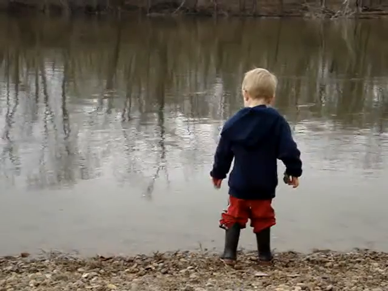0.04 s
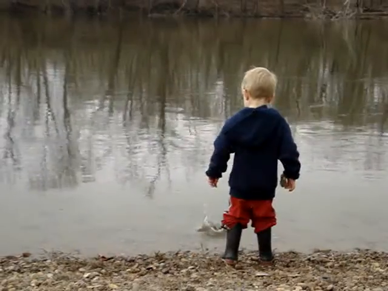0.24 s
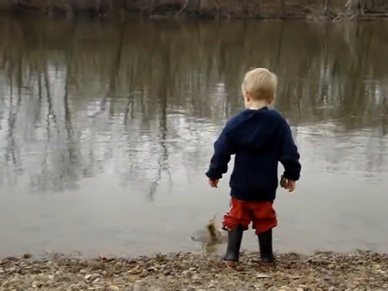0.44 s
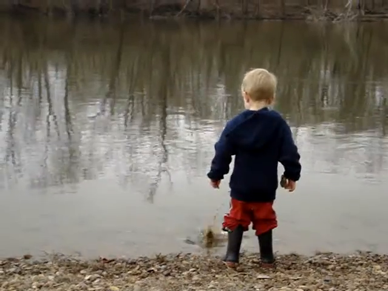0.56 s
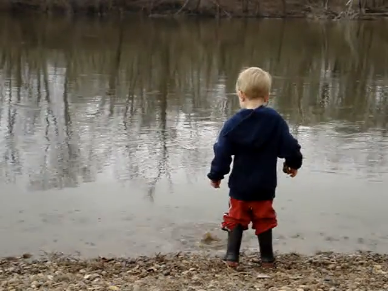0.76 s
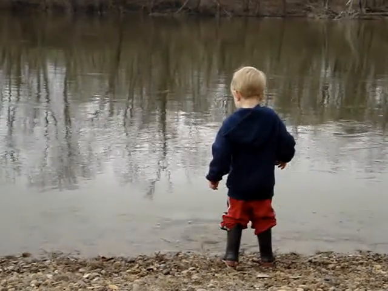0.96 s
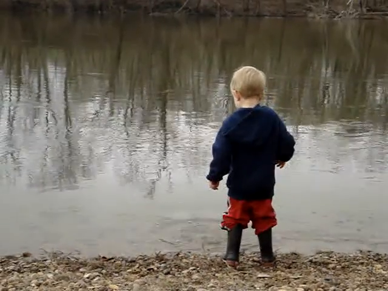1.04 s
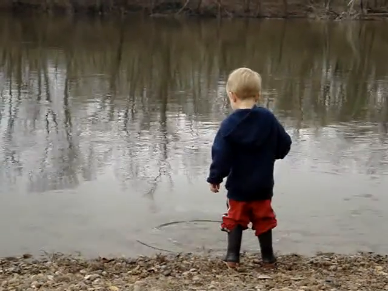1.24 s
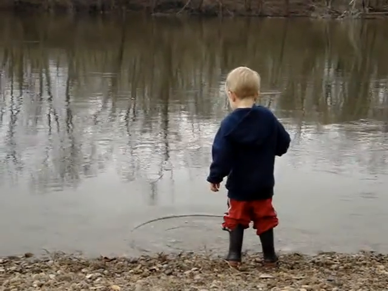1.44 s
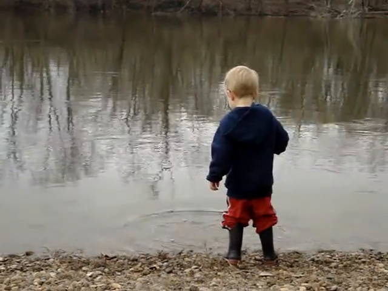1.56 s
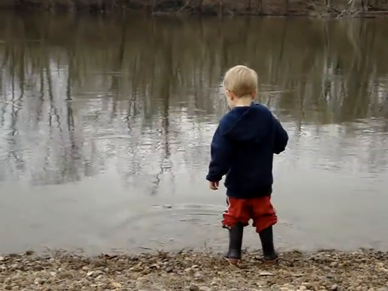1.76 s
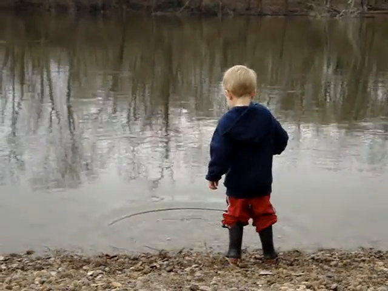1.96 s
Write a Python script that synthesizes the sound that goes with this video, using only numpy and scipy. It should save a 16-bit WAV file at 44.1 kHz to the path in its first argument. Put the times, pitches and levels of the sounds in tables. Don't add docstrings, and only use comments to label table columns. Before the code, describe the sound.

One close stone splash early on, sharp and brief, followed by light pattering drops and thin fizz; behind it a quiet outdoor river bed, very faint bird whistles and insect chirps, and slight camera whine.

```python
import sys
import numpy as np
from scipy import signal
from scipy.fft import rfft, irfft
from scipy.io import wavfile
from scipy.ndimage import uniform_filter1d

SR = 44100
rng = np.random.default_rng(int(sys.argv[2]) if len(sys.argv) > 2 else 0)


def generate_wav(sig):
    pcm = np.round(np.clip(np.atleast_2d(sig).T, -1, 1) * 32767).astype(np.int16)
    wavfile.write(sys.argv[1], SR, pcm)


def attenuation_scalar(level_db):
    decades = np.asarray(level_db, float) / 20
    return 10 ** decades


N = 88200

# pitch_hz, density_db (per Hz)
RIVER_SPECTRUM = [(12, -46), (20, -14), (261, 0.5), (357, -5), (1270, -7.5), (2570, -11.5), (3790, -13),
                  (7840, -20.5), (9900, -33.5), (12900, -61), (21800, -120)]
# start_s, length_s, start_hz, end_hz, level_db (rms)
BIRD_WHISTLES = [(0.14, .08, 3680, 3600, -63), (0.44, .08, 3700, 3720, -63), (0.66, .18, 3800, 3660, -59),
                 (0.85, .05, 3680, 3680, -63), (0.985, .14, 3760, 3700, -60), (1.185, .06, 3830, 3720, -58),
                 (1.235, .085, 3730, 3720, -61), (1.33, .06, 3800, 3850, -63),
                 (1.405, .065, 3850, 3720, -60), (1.53, .07, 3880, 3700, -60),
                 (1.64, .045, 4000, 3750, -63), (1.73, 0.05, 4150, 3650, -61),
                 (1.82, 0.045, 4050, 3680, -61), (1.895, .045, 4050, 3700, -62),
                 (1.97, .03, 3950, 3850, -62)]
# start_s, length_s, level_db (rms)
INSECT_CHIRPS = [(0.03, .04, -65), (0.15, .04, -66), (1.40, .03, -66), (1.465, .025, -61),
                 (1.497, .027, -59), (1.535, .04, -63), (1.60, .025, -63), (1.632, .025, -61),
                 (1.666, .036, -60), (1.76, .04, -68), (1.975, .03, -61)]
# start_s, crack_db, spray_db, spray_t60_s, spray_hz
SURFACE_SLAPS = [
    (0.2455, -60, -31, .03, 2300),
    (0.2486, -2.2, -17, .015, 3000),
    (0.2555, -45, -27, .014, 3200),
    (0.2656, -24, -25, .024, 2300),
    (0.2695, -50, -30, .014, 5000),
]
# start_s, level_db, pitch_hz, t60_s, glide_octaves_per_s
CAVITY_POCKETS = [(0.2372, -35, 810, .015, 0), (0.2487, -12, 3800, .009, 0), (0.2495, -11, 920, .024, -16),
                  (0.2495, -14, 2550, .016, -5), (0.2488, -15, 1400, .010, -20),
                  (0.2560, -29, 800, .03, -5), (0.2555, -28, 3800, .012, 0), (0.2495, -27, 8100, .012, -10),
                  (0.2659, -16, 1780, .021, -12), (0.2672, -21, 2800, .018, 0),
                  (0.2705, -25, 2500, .012, 20), (0.2700, -25, 1450, .016, -10),
                  (0.2660, -24, 680, .04, -8), (0.2780, -30, 600, .04, -5), (0.2768, -38, 4200, .015, 0),
                  (0.2760, -34, 2100, .03, 0)]
# start_s, level_db, pitch_hz, length_s,
# glide_octaves_per_s
GURGLE_BUBBLES = [(0.306, -46, 810, 0.0091, 0), (0.315, -37.5, 990, 0.011, 5), (0.326, -42, 980, .010, -25),
                  (0.339, -33, 540, 0.015, 12.5), (0.352, -42, 563, 0.0085, 0),
                  (0.359, -33, 587, 0.012, 34), (0.332, -44, 1400, 0.011, -2), (0.500, -48, 100, .035, -20),
                  (0.600, -54, 75, .05, -5), (0.700, -55, 70, .05, 0), (0.426, -39.5, 615, 0.005, -3),
                  (0.403, -47, 190, 0.018, 16), (0.79, -46.5, 798, 0.014, 0),
                  (0.780, -47.5, 2000, 0.011, 3), (1.385, -52.5, 1290, 0.062, 0)]
# start_s, ring_db, pitch_hz, t60_s, tick_db
FALLING_DROPS = [(0.298, -46, 2700, .02, -50), (0.301, -48, 5700, .015, -55), (0.310, -45, 2200, .015, -49),
                 (0.334, -46, 3300, .012, -48), (0.343, -49, 6500, .012, -48), (0.351, -48, 7000, .01, -47),
                 (0.359, -47, 3300, .012, -52), (0.3165, -35.5, 1380, 0.013, -43),
                 (0.381, -36, 3700, 0.016, -39), (0.3805, -46, 9000, .008, -52),
                 (0.384, -39, 2970, .02, -44), (0.443, -47, 3620, .02, -52),
                 (0.4597, -34, 3600, 0.017, -40), (0.4733, -44, 5960, .014, -40),
                 (0.475, -38, 6580, .014, -44), (0.506, -44, 8900, .008, -52),
                 (0.511, -42, 8960, 0.01, -43), (0.522, -41, 5970, .012, -52),
                 (0.5316, -29.5, 3070, 0.015, -33), (0.535, -36.5, 1030, 0.019, -40),
                 (0.5558, -35, 2480, 0.013, -41), (0.5572, -36, 3100, 0.013, -47),
                 (0.600, -46, 4580, 0.012, -53), (0.6166, -34.5, 1410, 0.041, -44),
                 (0.527, -48, 4500, .01, -48), (0.545, -50, 6000, .01, -47), (0.584, -50, 5500, .01, -46),
                 (0.634, -45, 6800, .01, -47), (0.65, -54, 5000, .01, -46),
                 (0.6719, -29.5, 3000, 0.013, -40), (0.6716, -38, 8500, .008, -30.5),
                 (0.688, -35.5, 5720, 0.011, -38), (0.695, -47, 9000, .008, -43),
                 (0.689, -35, 1064, 0.027, -49), (0.703, -39, 1250, 0.045, -52),
                 (1.650, -48, 2905, 0.032, -50), (1.108, -41.5, 2910, 0.023, -50),
                 (1.490, -52, 5000, 0.015, -42)]
# start_s, length_s, low_hz, high_hz, depth_db
BAND_DIPS = [(0.220, .025, 1400, 11000, -50), (0.224, .010, 30, 2500, -32),
             (0.230, .007, 30, 2500, -10), (0.283, .009, 2100, 3300, -22),
             (0.259, .0065, 2800, 11000, -12), (0.240, .036, 9000, 11000, -8),
             (0.2525, .009, 7000, 11000, -8), (0.275, .018, 4300, 5300, -14),
             (0.51, .018, 2900, 3400, -14), (0.273, .022, 5200, 7300, -35),
             (0.272, .020, 8200, 11000, -22), (0.277, .007, 7300, 8200, -25),
             (0.322, .008, 8300, 11000, -20), (0.361, .012, 5800, 6800, -18),
             (0.388, .008, 7800, 11000, -22), (0.450, .008, 9000, 11000, -22),
             (0.480, .027, 5300, 7300, -22), (0.563, .018, 5300, 7000, -16),
             (0.654, .015, 5000, 11000, -35), (0.678, .009, 5500, 11000, -28),
             (0.693, .033, 5200, 5900, -20), (0.608, .022, 6700, 7300, -20),
             (0.537, .010, 8300, 11000, -25), (1.497, .02, 6100, 8800, -18),
             (1.523, .010, 8200, 11000, -20), (1.541, .008, 8200, 11000, -20),
             (0.922, .010, 6500, 8300, -16)]

RIVER_DB, CRACKLE_DB = -48.5, 2.5
RUMBLE_DB, FLICKER_DB = 2.5, 1.01
WHINE_HZ, WHINE_WIDTH_HZ, WHINE_DB = 7568, 25, -67.5
INSECT_HZ = 5775
PUFF_S, PUFF_T60_S, PUFF_HZ, PUFF_DB = 1.930, 0.33, 123.4, -40.5
FIZZ_DB, FIZZ_START_S, FIZZ_T60_S, FIZZ_HZ = -48, 0.3, 1.4, 3000
DROP_GLIDE, CLICK_DB = 10.4, 5.5
TICK_HZ, TICK_T60_S = 5000, .014
CAVITY_RAGGED_DB = 1.2
THUMP_DB, THUMP_HZ, THUMP_T60_S = -32.5, 324, 0.009
HOLE_SHARE, BUSY_SHARE, HOLE_DB = .27, .5, -26
BUSY_S = (.27, .76)
TOP_HZ, MIC_HZ = 10020, 42


def band(x, hz, width):
    edges = [max(hz - width / 2, 5), hz + width / 2]
    return signal.sosfilt(signal.butter(1, edges, "band", fs=SR, output="sos"), x)


def unit(x):
    return x / np.sqrt(np.mean(x ** 2))


def walk(rate):
    k = int(SR / rate)
    return unit(uniform_filter1d(uniform_filter1d(rng.standard_normal(N), k), k))


def ragged(t, depth_db):
    return attenuation_scalar(depth_db * unit(uniform_filter1d(rng.standard_normal(len(t)), size=50)))


def add(out, s, sound):
    i = int(s * SR)
    out[i:i + len(sound)] += sound[:N - i]


def age(length):
    return np.arange(int(length * SR)) / SR


def decay(db, t, t60):
    return attenuation_scalar(db - 60 * t / t60)


def rise(t, seconds):
    return 1 - np.exp(-t / seconds)


def swell(t, length, edge):
    return np.sin(np.pi / 2 * np.clip(np.minimum(t, length - t) / edge, 0, 1)) ** 2


def tone(t, hz, glide):
    return np.sin(2 * np.pi * np.cumsum(hz * 2 ** (glide * t)) / SR)


def click(t, peak_s, width_s):
    return np.exp(-((t - peak_s) / width_s) ** 2)


def burst(db, hz, t60, rise_s):
    t = age(.06)
    hiss = unit(band(band(rng.standard_normal(len(t)), hz, 1.67 * hz), hz, 1.71 * hz))
    return decay(db, t, t60) * rise(t, rise_s) * hiss


def river():
    out, drift = 0, walk(1.7)
    table = np.array(RIVER_SPECTRUM)
    for hz in 25 * 2 ** np.arange(.5, 8.9, .5):
        noise = rng.standard_normal(N) * attenuation_scalar(CRACKLE_DB * rng.exponential(size=N))
        flicker_db = (RUMBLE_DB if hz < 150 else FLICKER_DB) * walk(7.8)
        density_db = np.interp(np.log(hz), np.log(table[:, 0]), table[:, 1])
        db = density_db + 0.19 * drift + flicker_db
        out = out + attenuation_scalar(db) * band(band(noise, hz, 0.56 * hz), hz, 0.56 * hz)
    return attenuation_scalar(RIVER_DB) * unit(out)


def camera_whine():
    pitch_hz = WHINE_HZ + WHINE_WIDTH_HZ * walk(79)
    return attenuation_scalar(WHINE_DB) * np.sin(2 * np.pi * np.cumsum(pitch_hz) / SR)


def wildlife():
    out = np.zeros(N)
    for s, length, hz, end_hz, db in BIRD_WHISTLES:
        t = age(length)
        glide = np.log2(end_hz / hz) / length
        add(out, s, attenuation_scalar(db + 3.0) * swell(t, length, .010) * tone(t, hz, glide))
    for s, length, db in INSECT_CHIRPS:
        t = age(length)
        add(out, s, attenuation_scalar(db + 3.5) * swell(t, length, 0.007) * tone(t, INSECT_HZ, 0))
    return out * attenuation_scalar(1.1 * walk(60))


def wind():
    out, t = np.zeros(N), age(.1)
    pitch_hz = PUFF_HZ * (1 + .05 * walk(60)[:len(t)] - 1.8 * t)
    phase = 2 * np.pi * np.cumsum(pitch_hz) / SR
    harmonic = attenuation_scalar(-8.5) * np.sin(2 * phase - 1.3)
    noise = attenuation_scalar(-6.5) * unit(band(rng.standard_normal(len(t)), PUFF_HZ, 140))
    flutter = np.sin(phase) + harmonic + noise
    add(out, PUFF_S, decay(PUFF_DB, t, PUFF_T60_S) * rise(t, 0.0039) * flutter)
    return out


def fizz():
    out, t = np.zeros(N), age(1.1)
    strength_db = 5.5 * np.minimum(rng.exponential(size=len(t)), 4.5)
    grains = rng.standard_normal(len(t)) * attenuation_scalar(strength_db)
    hiss = unit(band(band(grains, FIZZ_HZ, 1.7 * FIZZ_HZ), FIZZ_HZ, 1.7 * FIZZ_HZ))
    add(out, FIZZ_START_S, decay(FIZZ_DB, t, FIZZ_T60_S) * hiss)
    return out


def droplets():
    out, t = np.zeros(N), age(.06)
    for s, db, hz, t60, tick_db in FALLING_DROPS:
        ring = decay(db, t, t60) * rise(t, 0.00027) * ragged(t, 2.2) * tone(t, hz, DROP_GLIDE)
        tick = attenuation_scalar(tick_db + CLICK_DB) * click(t, 1.5e-4, 5e-5)
        spit = burst(tick_db, (hz + TICK_HZ) / 2, TICK_T60_S, 4e-4)
        add(out, s, ring - tick + spit)
    return out


def gurgles():
    out, t = np.zeros(N), age(.06)
    for s, db, hz, length, glide in GURGLE_BUBBLES:
        add(out, s, attenuation_scalar(db) * swell(t, length, 0.35 * length) * tone(t, hz, glide))
    return out


def cavity():
    out, t = np.zeros(N), age(.06)
    for s, db, hz, t60, glide in CAVITY_POCKETS:
        envelope = decay(db, t, t60) * ragged(t, CAVITY_RAGGED_DB) * rise(t, 0.00036)
        add(out, s, envelope * tone(t, hz, glide))
    return out


def slaps():
    out, t = np.zeros(N), age(.06)
    for s, crack_db, spray_db, t60, hz in SURFACE_SLAPS:
        crack = attenuation_scalar(crack_db) * click(t, 1.2e-4, 4.5e-5)
        add(out, s, burst(spray_db, hz, t60, 2e-4) - crack)
    thump = decay(THUMP_DB, t, THUMP_T60_S) * tone(t, THUMP_HZ, 0)
    add(out, SURFACE_SLAPS[1][0], -thump)
    return out


def scene():
    background = river() + camera_whine() + wildlife() + wind()
    splash = fizz() + droplets() + gurgles() + cavity() + slaps()
    return (background + splash)[None]


def patchy(x):
    f, t, z = signal.stft(x, SR, nperseg=256, noverlap=192)
    patches = rng.random((z.shape[0] // 5 + 1, z.shape[1] // 4 + 1))
    luck = np.kron(patches, np.ones((5, 4)))[:len(f), :len(t)]
    share = np.where((t > BUSY_S[0]) & (t < BUSY_S[1]), BUSY_SHARE, HOLE_SHARE)
    off_whine = np.abs(f[:, None] - WHINE_HZ) > 150
    height = np.clip((f[:, None] - 3800) / 5200, 0, 1.1) * off_whine
    quiet = np.abs(z) < 3 * np.median(np.abs(z), axis=1, keepdims=True)
    gone = (luck < share * height) & quiet
    makeup = 1 / np.sqrt(1 - np.minimum(share * height, .6))
    keep = np.where(gone, attenuation_scalar(HOLE_DB), makeup)
    return signal.istft(z * np.where(quiet, keep, 1), SR, nperseg=256, noverlap=192)[1][:N]


def dip_bands(x):
    f = np.fft.rfftfreq(4096, 1 / SR)
    t = np.arange(4096) / SR - 1024 / SR
    for s, length, lo_hz, hi_hz, db in BAND_DIPS:
        i = int(s * SR) - 1024
        mask = uniform_filter1d(1. * (f > lo_hz) * (f < hi_hz), size=30)
        part = irfft(rfft(x[i:i + 4096]) * mask)
        add(x, i / SR + 1e-6, -(1 - attenuation_scalar(db)) * swell(t, length, .003) * part)
    return x


def low_pass(x):
    return signal.sosfilt(signal.butter(12, 10630, fs=SR, output="sos"), x)


def record(dry):
    top_cut = signal.ellip(8, .1, 17, TOP_HZ, fs=SR, output="sos")
    x = dip_bands(patchy(signal.sosfiltfilt(top_cut, dry[0])))
    x = signal.sosfilt(signal.butter(2, MIC_HZ, "high", fs=SR, output="sos"), x)
    return low_pass(x[None])


dry = scene()
out = record(dry)
generate_wav(out)
```